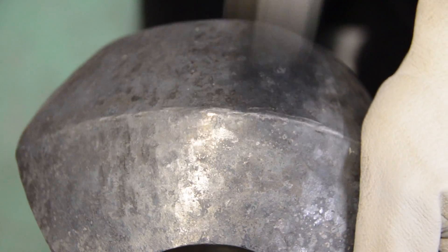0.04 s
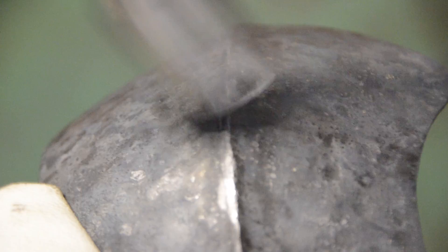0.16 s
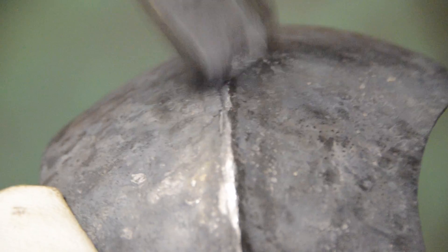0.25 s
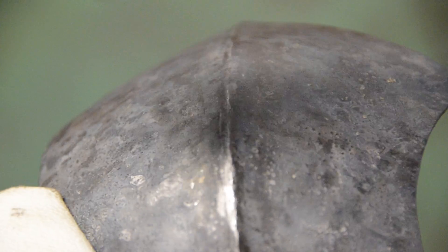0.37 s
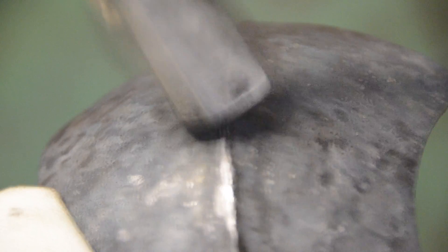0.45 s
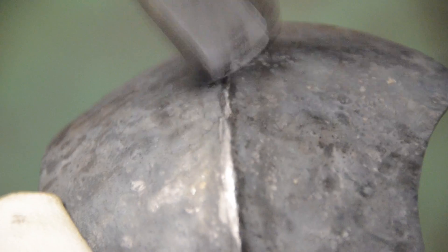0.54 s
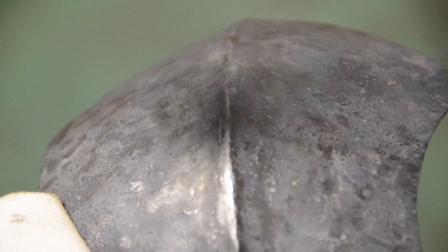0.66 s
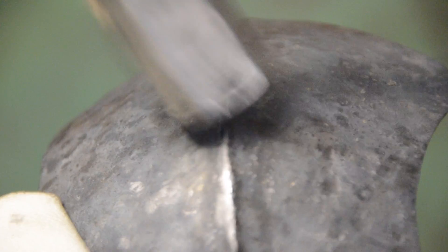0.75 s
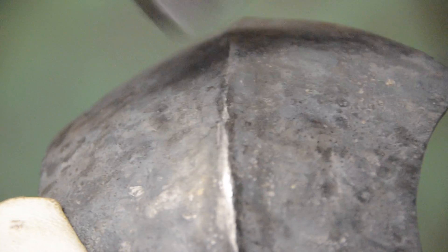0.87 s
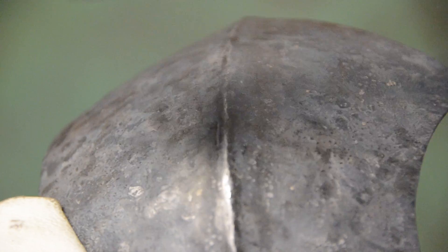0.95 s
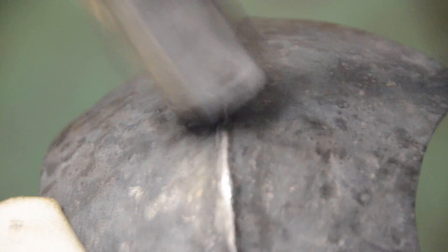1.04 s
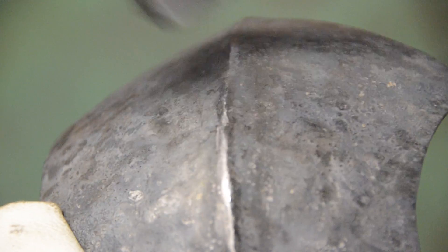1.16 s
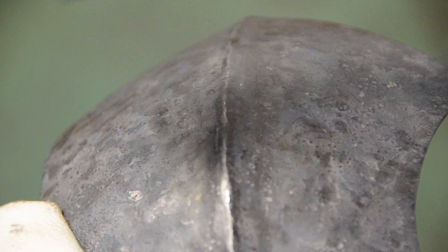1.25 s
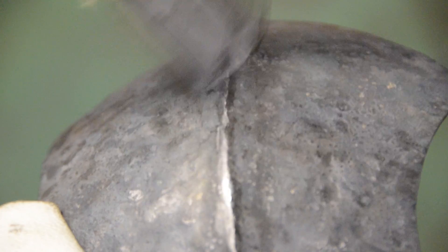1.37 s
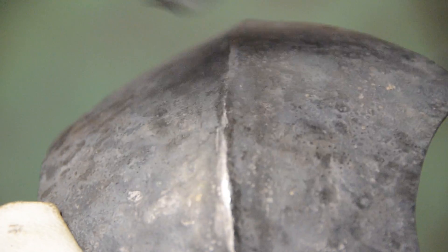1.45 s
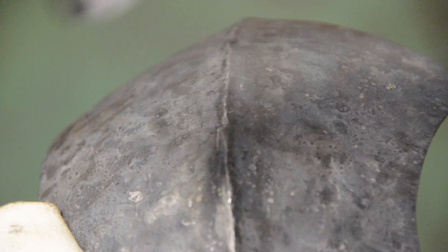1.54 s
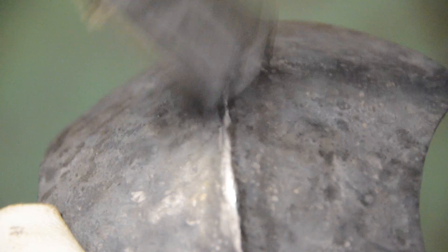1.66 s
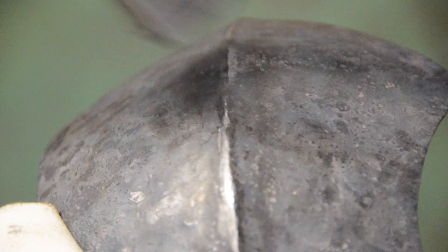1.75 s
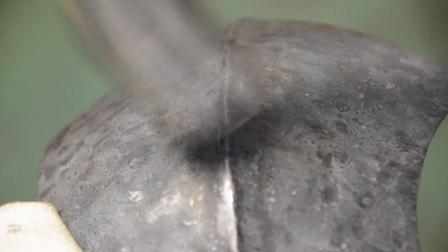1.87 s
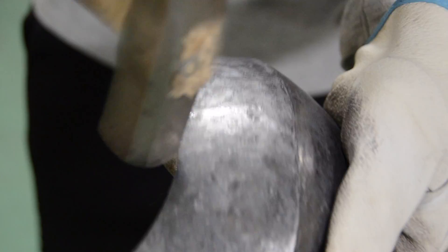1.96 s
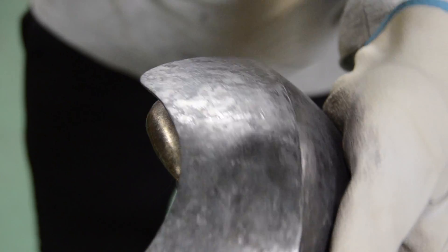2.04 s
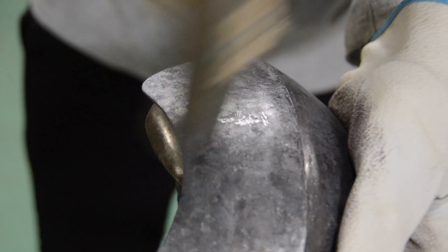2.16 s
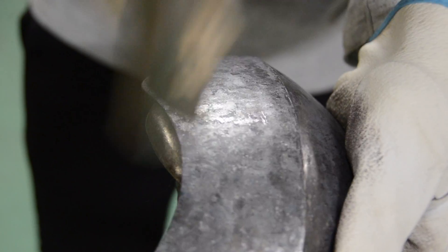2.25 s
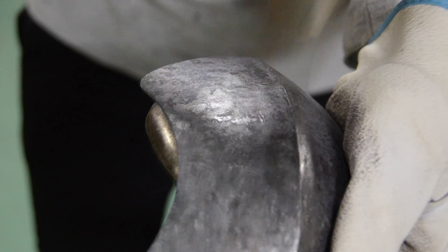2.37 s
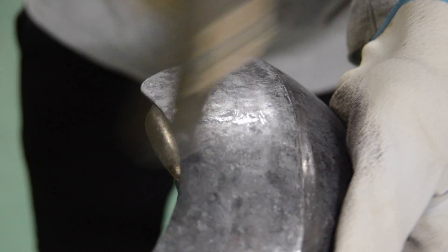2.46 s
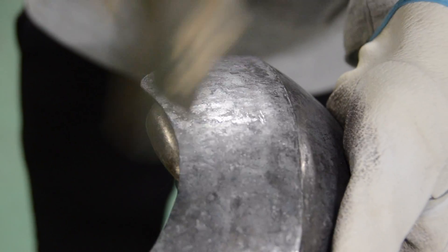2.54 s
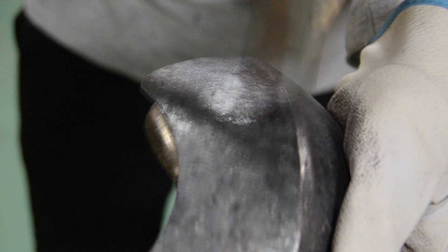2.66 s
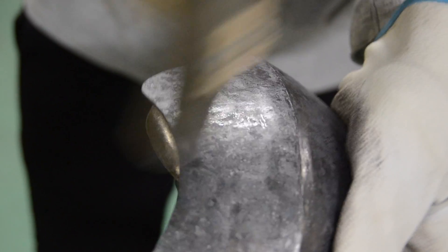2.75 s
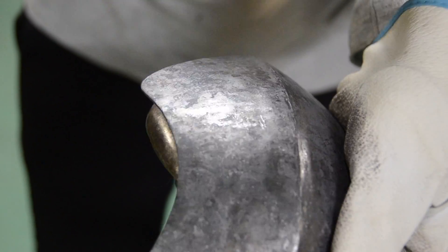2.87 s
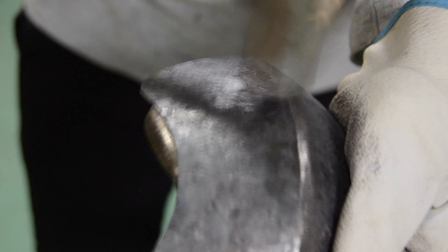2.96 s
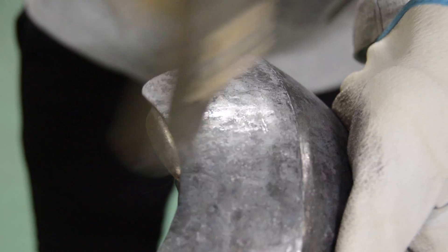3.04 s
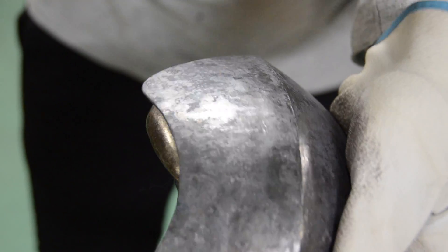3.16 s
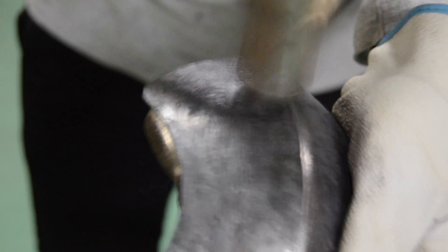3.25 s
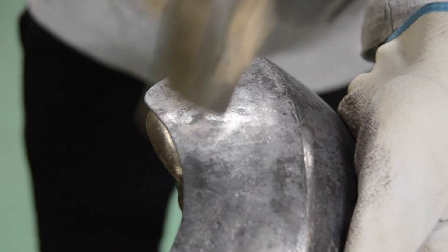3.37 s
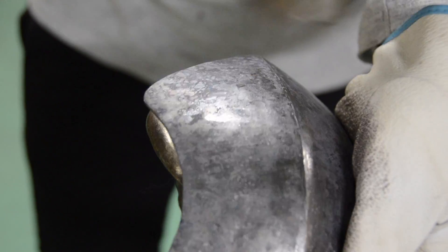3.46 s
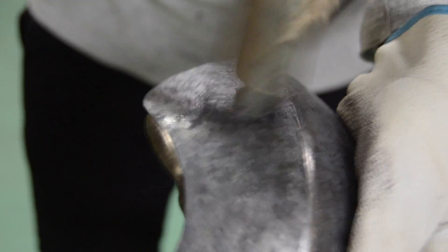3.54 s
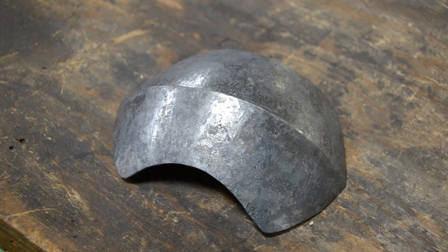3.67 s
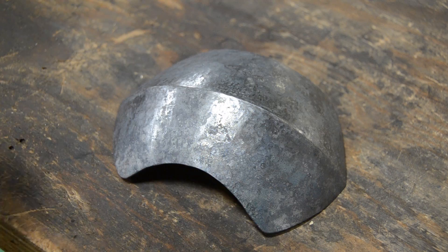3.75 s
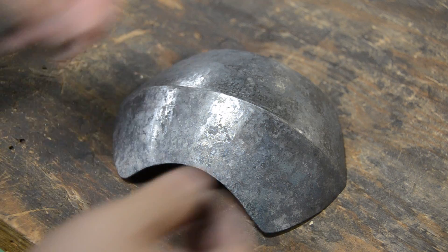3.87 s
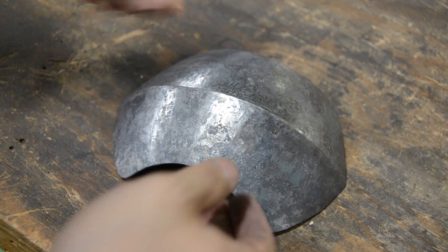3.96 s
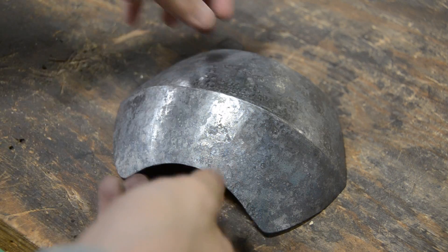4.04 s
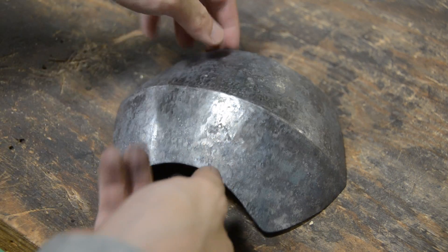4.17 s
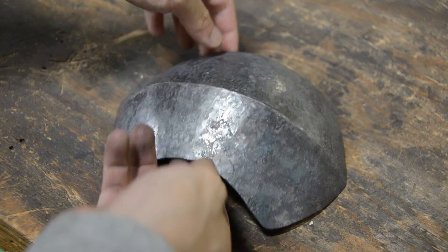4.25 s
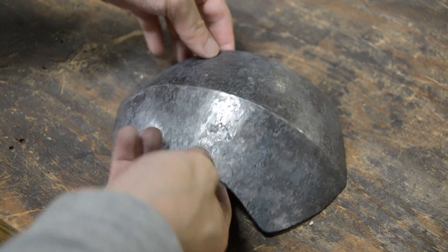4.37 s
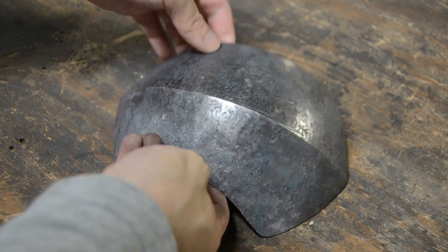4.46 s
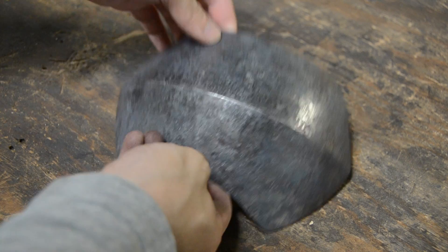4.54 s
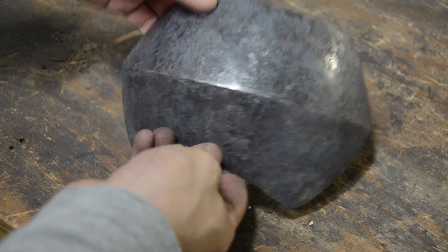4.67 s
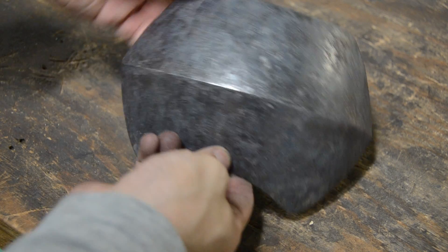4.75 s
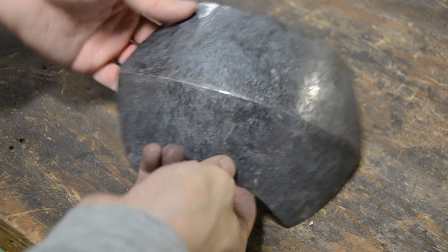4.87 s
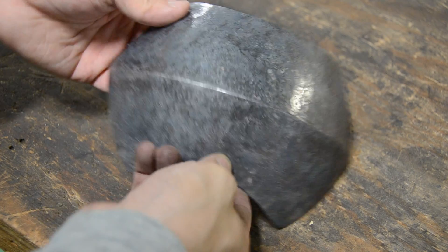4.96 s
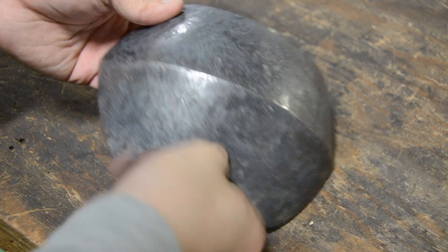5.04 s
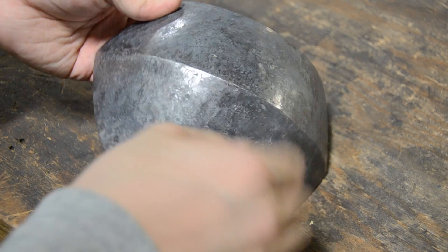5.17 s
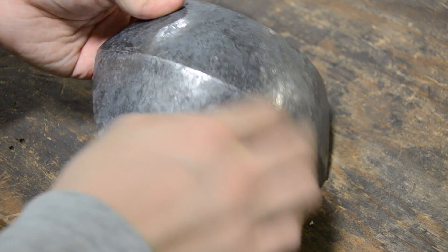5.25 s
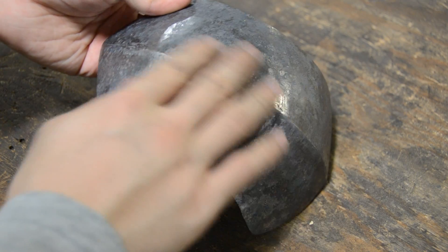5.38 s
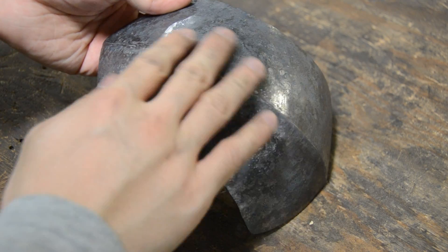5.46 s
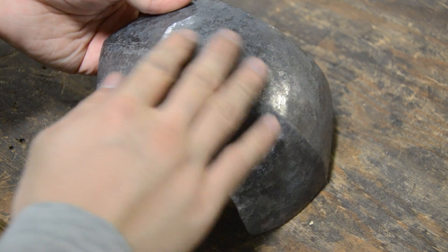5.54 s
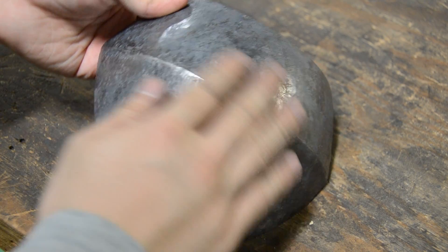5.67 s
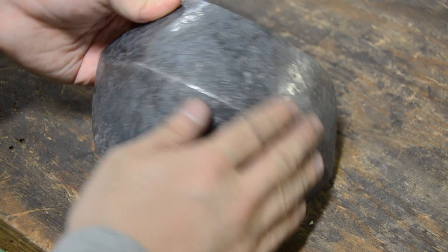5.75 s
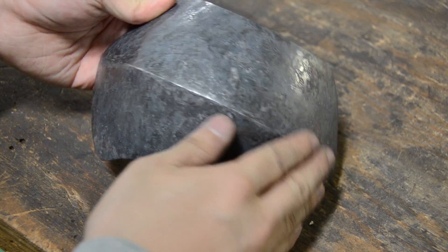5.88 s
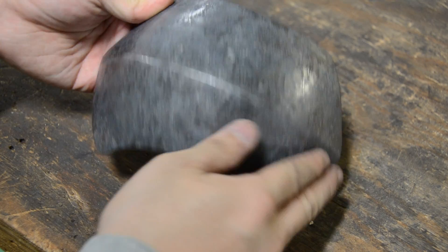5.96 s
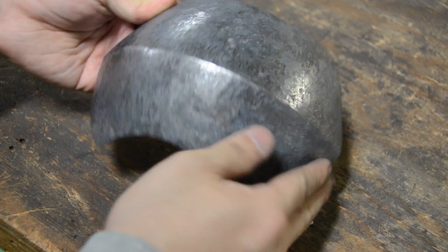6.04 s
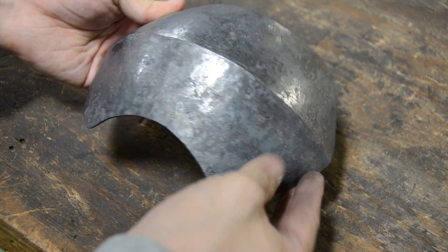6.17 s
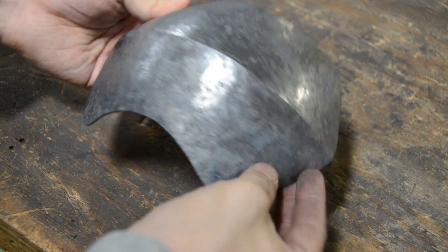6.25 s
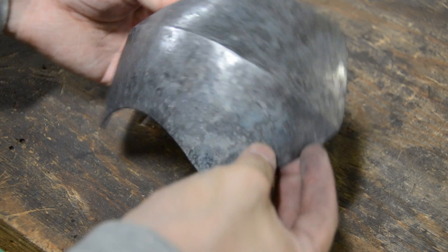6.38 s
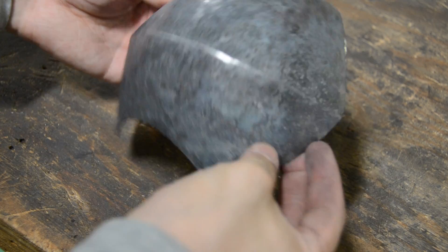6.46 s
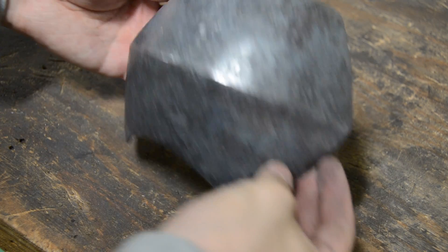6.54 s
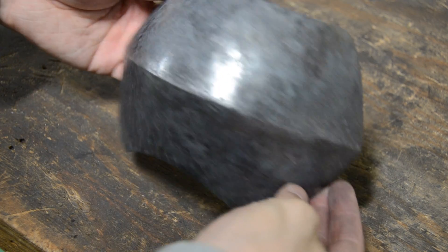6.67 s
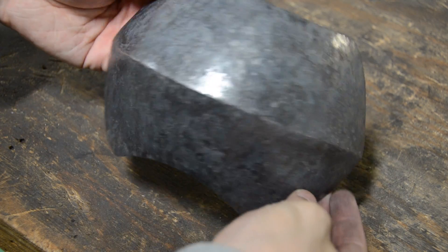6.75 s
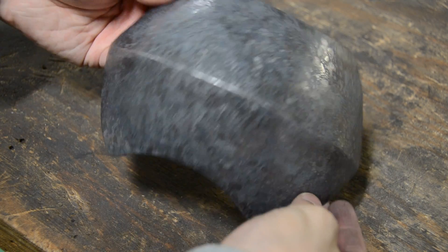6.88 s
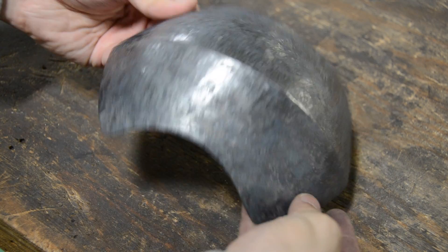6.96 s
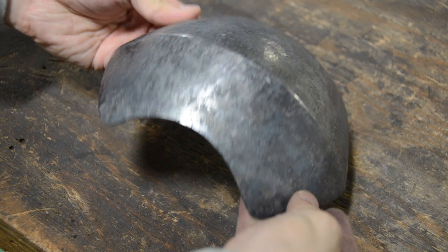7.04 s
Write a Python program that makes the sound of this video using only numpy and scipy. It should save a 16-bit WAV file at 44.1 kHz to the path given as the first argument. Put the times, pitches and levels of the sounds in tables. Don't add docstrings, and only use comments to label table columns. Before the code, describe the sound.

A hammer strikes a domed steel plate in a lively workshop, blows ringing and bouncing, then abruptly hands handle and rub the plate on a quiet bench.

```python
import sys
import numpy as np
from scipy import signal
from scipy.fft import rfft, irfft, next_fast_len
from scipy.io import wavfile
from scipy.ndimage import uniform_filter1d, map_coordinates

SR = 44100
rng = np.random.default_rng(int(sys.argv[2]) if len(sys.argv) > 2 else 0)


def digitize_waveform(pressure):
    field = np.atleast_2d(pressure).T
    bounded = np.clip(field, -1, 1)
    quanta = np.round(bounded * 32767).astype(np.int16)
    wavfile.write(sys.argv[1], SR, quanta)


def convert_level_to_amplitude(level_db):
    exponent = np.asarray(level_db, float) / 20
    return 10 ** exponent


N = 313551
LEAD = 0.25

VIEW_CHANGES = (1.951, 3.618)

# frequency in Hz, level in dB per Hz.
ROOM_TONE = [(15, -40.5), (25, -3.5), (317, 2), (362, 0.5), (462, 0), (543, 1), (3140, -10), (5700, -11.5),
             (6180, -9), (6880, -24), (8780, -17.5), (15900, -35)]
# frequency in Hz, level in dB.
MAINS_HUM = [(60, -55), (120, -61), (185, -56)]
# frequency in Hz, time to fall by 60 dB in seconds.
HALL_DECAY = [(100, 0.44), (500, 0.42), (2000, 0.45), (5000, 0.43), (10000, 0.36), (15000, 0.3)]
# delay in seconds, level in dB.
WALL_ECHOES = [(.0048, -8.5), (0.0132, -18), (0.0132, -19), (0.017, -18), (0.027, -16.5)]
# centre in Hz, width in Hz, depth in dB.
MICROPHONE_NOTCHES = [(5820, 720, -14), (6890, 82, -4.5)]

# centre in seconds, length in seconds, low part in dB, high part in dB.
SLEEVES = [
    (3.92, 0.38, -80, -64.5),
    (4.429, 0.34, -63.5, -67),
    (5.12, 0.59, -62, -75.5),
    (5.902, 0.75, -66, -73),
    (6.5, 0.7, -81.5, -68),
]

# start in seconds, peak in dB, extra boom in dB.
BENCH_KNOCKS = [
    (4.469, -35.5, -1.5),
    (4.904, -43, 9),
    (4.999, -27.5, -12),
    (5.089, -57, 19.5),
    (5.263, -45.5, 8.5),
    (5.681, -53, 1.5),
    (6.393, -54.5, -4),
    (6.774, -54.5, 0),
]
# frequency in Hz, width in Hz, level in dB.
BENCH_WOOD = [(367, 290, 7), (660, 120, 10), (915, 210, 3.5), (1280, 130, 2), (1900, 1200, -8.5)]
# frequency in Hz, width in Hz, level in dB.
BENCH_BOOM = [(118, 4.1, 8), (283, 63, -7)]

# centre in seconds, length in seconds, rubbing in dB,
# freedom of the lower modes in dB, pitch the grip leaves freest in Hz.
STROKES = [(4.171, .05, -64.5, -5, 4590), (4.25, 0.09, -65, -3, 5140), (4.327, 0.098, -58, -8, 5100),
           (4.445, 0.065, -64.5, -4, 5150), (4.521, .07, -73, 1, 5200), (4.68, 0.043, -56.5, -8.5, 5920),
           (4.736, 0.043, -56.5, -10.5, 5580), (4.913, 0.032, -62.5, 2, 4560),
           (4.993, 0.082, -53.5, -2, 4960), (5.065, .11, -54.5, -4, 6240), (5.16, .09, -72, -4, 6700),
           (5.27, 0.016, -57, -2, 4620), (5.385, 0.19, -54.5, -21.5, 6410), (5.704, 0.36, -50.5, -20, 5200),
           (5.966, .15, -51.5, -2, 6260), (6.177, .08, -60.5, 2, 6110), (6.262, 0.076, -66, 4, 6110),
           (6.421, .14, -59.5, -0.5, 4800), (6.714, .3, -70, -2, 6100), (6.94, 0.1007, -65, -7, 6120),
           (7.02, 0.039, -60.5, -15.5, 6090), (7.086, 0.089, -64.5, -6.5, 6080),
           (5.4, 3.4, -80, -17.5, 5247)]
# start in seconds, peak in dB, extra ring in dB.
TICKS = [(4.1534, -50, 0), (4.4314, -54.5, 1.5), (4.5064, -50, 1), (4.6748, -52, 0), (4.7314, -47.5, -4.5),
         (4.8794, -53, 6), (4.9072, -41, -1), (4.9614, -50, 0), (5.024, -32, -5.5), (5.0464, -33, -8),
         (5.0674, -44, 7), (5.1544, -39.5, -7), (5.2664, -49, -1.5), (5.2959, -42.5, -1),
         (5.6894, -38.5, -3.5), (6.1559, -46, -3), (6.2414, -46.5, 0.5), (6.3939, -42.5, 3.5),
         (7.0135, -51, -1)]
# frequency in Hz, level in dB per Hz.
SKIN_HISS = [(880, -45), (1500, -19), (2180, -16.5), (4530, -27), (4910, -24), (5310, -26), (5810, -1),
             (7290, -7), (9610, 1), (15900, -37)]
# frequency in Hz, width in Hz, level in dB.
FREE_PLATE = [(2990, 25, 0), (3780, 120, -9), (4560, 48, -1), (5250, 24, 1.5), (5400, 32, -1),
              (6110, 42, 7), (6840, 50, 3), (7204, 48, -5), (7200, 60, -12), (7490, 45, 0), (8000, 20, -8),
              (8000, 50, -5), (8557, 44, -5), (8600, 62, -3), (9800, 32, -2), (9220, 31, -8.5),
              (9650, 60, -18), (10200, 50, -17), (10250, 70, -22.5), (10100, 60, -16), (10800, 69, -13),
              (11570, 60, -7), (12300, 60, -14), (13000, 80, -18)]

# start in seconds, peak in dB, thud in dB, low ring in dB, deep part in dB.
RIDGE_BLOWS = [
    (-.18, -0.5, -1, -12.5, -0.5),
    (.108, 16.5, -6, -20, -2.5),
    (.199, 5.5, -6, -0.5, -4.5),
    (0.482, 11, -3.5, -1.5, -1),
    (.772, 4.5, -3, -2, 0.5),
    (1.061, 5.5, -3, -10.5, -0.5),
    (1.346, 3, -5, -1, -5),
    (1.637, 10, -4.5, -15, -1),
    (1.916, 2, -9, -10, -9),
]
# start in seconds, peak in dB.
RIDGE_BOUNCES = [
    (0.821, -10.5),
    (1.388, -11),
]
# thud, low ring, bright part, deep part [dB].
RIDGE_BOUNCE_COLOUR = (-4.5, -16, -13.5, -1.5)
# start in seconds, peak in dB, thud in dB.
RIM_BLOWS = [
    (1.84, 3.5, -11),
    (2.123, -1.5, -4),
    (2.4106, 9, -3.5),
    (2.69, 8.5, -6.5),
    (2.978, 7.5, -10.5),
    (3.262, 7, -13),
    (3.538, 6, -11),
]
# low ring, bright part, deep part [dB].
RIM_BLOW_COLOUR = (-3.5, -3, -5.5)
# start in seconds, peak in dB.
RIM_BOUNCES = [
    (1.868, -0.5),
    (2.1464, 7),
    (2.18, -10),
    (2.44, 3.5),
    (2.723, 7),
    (3.009, 5.5),
    (3.289, -0.5),
    (3.572, -3.5),
]
# thud, low ring, bright part, deep part [dB].
RIM_BOUNCE_COLOUR = (1, -6, -7.5, -5)
# frequency in Hz, level in dB per Hz.
RIDGE_BODY = [(35, -60), (60, -36), (447, -23.5), (879, -16.5), (1040, -11.5), (1860, -3.5), (2240, -4.5),
              (2570, -6.5), (3650, -23), (4110, -18), (5830, -21), (8670, -21), (12600, -39.5),
              (15900, -50.5)]
RIM_BODY = [(35, -59.5), (60, -35.5), (184, -11), (388, -13.5), (1160, -2), (2290, -5), (3410, -11.5),
            (4010, -1), (5310, -29.5), (5690, -16.5), (6110, -4), (9290, -7), (14100, -29), (15900, -84.5)]
# frequency in Hz, width in Hz, level in dB.
RIDGE_RING = [(936, 140, -13), (2545.5, 24, 4.5), (2573, 30, -1), (4090, 48, -10), (5310, 49, -19),
              (6230, 26, -13), (6550, 24, -18.5), (7280, 36, -24), (7476, 32, -29), (7735, 9.5, -27.5),
              (8645, 59, -30.5), (8847, 30, -24.5), (9600, 31, -24), (11100, 84, -33)]
RIM_RING = [(1750, 13, -11), (1996, 20, -2.5), (2239, 41, -13.5), (3739, 46, -3.5), (4035, 28, 2.5),
            (5260, 110, -9), (6106, 50, -3), (6680, 140, -16), (7000, 60, -7.5), (7830, 42, -9),
            (8420, 55, -0.5), (9300, 25, -4.5), (10150, 70, -10), (10880, 57, -16), (11050, 190, -22),
            (12700, 66, -29.5), (13000, 130, -28)]
# frequency in Hz, level in dB.
RIDGE_FACING = [(500, -1), (1400, 6), (2000, -1), (2550, 0), (3300, -2), (12000, 8.5)]
RIM_FACING = [(500, -3), (1400, 1.5), (2500, 1.5), (3900, -0.5), (8000, 3), (12000, 1.5)]


def unit(x):
    return x / np.sqrt(np.mean(x ** 2) + 1e-20)


def along(points, hz):
    f, v = np.transpose(points)
    return np.interp(np.log(hz + 1), np.log(f + 1), v)


def causal(gain):
    cepstrum = irfft(np.log(gain + 1e-6))
    half = len(cepstrum) // 2
    cepstrum[1:half] *= 2
    cepstrum[half + 1:] = 0
    return np.exp(rfft(cepstrum))


def modes(table, f):
    total = 0
    for k, (hz, width, db) in enumerate(table):
        damping = 1j * f * width
        total = total + (-1) ** k * convert_level_to_amplitude(db) * damping / (hz * hz - f * f + damping + 1e-9)
    return total


def filtered(x, response):
    m = next_fast_len(len(x) + SR // 2) // 2 * 2
    return irfft(rfft(x, m) * response(np.fft.rfftfreq(m, 1 / SR)), m)[:len(x)]


def wobble(step):
    knots = rng.standard_normal(int(N / step) + 4)
    return map_coordinates(knots, [np.arange(N) / step], order=1)


def swells(centre, length, db):
    t = np.arange(N)[::32, None] / SR
    place = np.abs(2 * (t - centre) / length)
    gain = convert_level_to_amplitude(db - 14.5 * place ** 3.8).sum(axis=1)
    return np.interp(np.arange(N) / SR, t[:, 0], gain)


def pulses(rows, extra):
    x = np.zeros(N)
    for s, db, more_db in rows:
        x[round(s * SR)] = convert_level_to_amplitude(db + extra * more_db)
    return x


def air(n):
    return unit(filtered(rng.standard_normal(n), lambda f: convert_level_to_amplitude(along(ROOM_TONE, f))))


def quiet():
    centre, length, low_db, high_db = np.transpose(SLEEVES)
    tone = air(N)
    upper = filtered(tone, lambda f: 1j * f / (900 + 1j * f))
    low = np.hypot(convert_level_to_amplitude(-64.5), swells(centre, length, low_db))
    high = np.hypot(convert_level_to_amplitude(-68), swells(centre, length, high_db + 1))
    return low * (tone - upper) + high * upper


def hall(x, near, wet_db):
    hz, t, z = signal.stft(rng.standard_normal(len(x)), SR, nperseg=256)
    decay = convert_level_to_amplitude(-60 * t / along(HALL_DECAY, hz)[:, None])
    tail = signal.istft(z * decay, SR, nperseg=256)[1][:len(x)]
    tail = tail * (1 - np.exp(-np.arange(len(x)) / (SR * 0.027)))
    tail = convert_level_to_amplitude(wet_db) * tail / np.linalg.norm(tail)
    walls = sum(convert_level_to_amplitude(db) * np.pad(near, (round(s * SR), 0))[:len(x)] for s, db in WALL_ECHOES)
    return near + walls + signal.fftconvolve(x, tail)[:len(x)]


def bench():
    def soft(f):
        return np.exp(-2j * np.pi * f * 0.00292) / (1 + 1j * f / 1500) ** 2

    knock = filtered(pulses(BENCH_KNOCKS, extra=0), lambda f: convert_level_to_amplitude(27) * soft(f) * modes(BENCH_WOOD, f))
    boom = filtered(pulses(BENCH_KNOCKS, extra=1), lambda f: convert_level_to_amplitude(45.5) * soft(f) * modes(BENCH_BOOM, f))
    near = knock + boom
    start = round(4.4 * SR)
    return np.pad(hall(knock[start:], near[start:], wet_db=-8), (start, 0))


def hands():
    centre, length, rub_db, free_db, grip_hz = np.transpose(STROKES)
    rub = swells(centre, length, rub_db)

    def free(hz):
        damped_db = 26 * np.abs(np.log2(hz / grip_hz))
        return swells(centre, length, rub_db + free_db + 9 - damped_db)

    palm = swells(centre, length, rub_db - 0.31 * free_db - 10)
    hiss = unit(filtered(rng.standard_normal(N), lambda f: convert_level_to_amplitude(along(SKIN_HISS, f))))
    slips = convert_level_to_amplitude(13.5) * unit(rng.standard_normal(N) * convert_level_to_amplitude(4.6 * wobble(150)))
    taps = convert_level_to_amplitude(25) * pulses(TICKS, extra=1)
    sing = np.zeros(N)
    for hz, width, db in FREE_PLATE:
        keep = np.exp(-np.pi * width / SR)
        pole = [1, -2 * keep * np.cos(2 * np.pi * hz / SR), keep ** 2]
        push = slips * (free(hz) if hz < 7000 else rub) + taps
        push = push * convert_level_to_amplitude(db + 2.5 * wobble(2600))
        sing += signal.lfilter([1 - keep, 0, keep - 1], pole, push)
    ticks = filtered(pulses(TICKS, extra=0), lambda f: convert_level_to_amplitude(-7) * causal(convert_level_to_amplitude(along(SKIN_HISS, f) / 2)))
    sing = filtered(sing, lambda f: 1 / (1 + (f / 11500) ** 8) / (1 + (2500 / (f + 1)) ** 6))
    return palm * hiss + sing + ticks


def rough_contact(chatter):
    t = np.arange(SR) / SR
    contact = rng.standard_normal(SR) * np.exp(-t / chatter)
    contact[0] += 4
    contact = rfft(contact)
    contact = irfft(contact / causal(np.abs(contact)))
    return rfft(contact * np.exp(-t / (5 * chatter)))


def hammer(blows, body, ring, facing, ring_db, chatter, drive_db):
    out = np.zeros(N + 2 * SR)
    f = np.fft.rfftfreq(SR, 1 / SR)
    toward = causal(convert_level_to_amplitude(along(facing, f)))
    for s, db, thud_db, low_db, bright_db, deep_db in blows:
        contact = rough_contact(chatter)
        tilt = [(1000, deep_db), (1400, thud_db), (2600, thud_db), (3300, bright_db)]
        struck = []
        for (hz, width, mode_db), share_db in zip(ring, 1.8 * rng.standard_normal(len(ring))):
            colour_db = low_db if 1500 < hz < 4500 else along(tilt, hz)
            struck.append((hz, width, mode_db + share_db + colour_db))
        clumps_db = 3.5 * np.interp(f / 90.34, np.arange(300), rng.standard_normal(300))
        dense = causal(convert_level_to_amplitude(along(body, f) + along(tilt, f) + clumps_db))
        blow = contact * (dense + convert_level_to_amplitude(ring_db) * modes(struck, f))
        start = round((s + LEAD + 0.0007) * SR)
        out[start:][:SR] += convert_level_to_amplitude(db + drive_db) * hall(irfft(blow), irfft(blow * toward), wet_db=-4.5)
    return out[:N + round(LEAD * SR)]


def ridge_hammering():
    blows = [row + RIDGE_BOUNCE_COLOUR for row in RIDGE_BOUNCES]
    for s, db, thud_db, low_db, deep_db in RIDGE_BLOWS:
        blows.append((s, db, thud_db, low_db, -1 + 0.22 * low_db, deep_db))
    return hammer(sorted(blows), RIDGE_BODY, RIDGE_RING, RIDGE_FACING, ring_db=2, chatter=0.0056, drive_db=64.5)


def rim_hammering():
    blows = [row + RIM_BLOW_COLOUR for row in RIM_BLOWS]
    blows += [row + RIM_BOUNCE_COLOUR for row in RIM_BOUNCES]
    return hammer(blows, RIM_BODY, RIM_RING, RIM_FACING, ring_db=8.5, chatter=0.0035, drive_db=47.5)


def microphone(x):
    def notches(f):
        db = sum(depth / (1 + (2 * (f - hz) / width) ** 2) for hz, width, depth in MICROPHONE_NOTCHES)
        return causal(convert_level_to_amplitude(db))

    return filtered(x, notches)


def gain_control(x, knee_db, recover_db, air_db):
    t = np.arange(len(x)) / SR
    hum = sum(convert_level_to_amplitude(db) * np.sin(2 * np.pi * hz * t) for hz, db in MAINS_HUM)
    x = x + convert_level_to_amplitude(air_db) * air(len(x)) + hum
    power = np.abs(uniform_filter1d(x ** 2, 64, origin=31))
    over = 10 * np.log10(power + 1e-12) - knee_db
    climb = recover_db * t
    cut_db = np.maximum(np.maximum.accumulate(over + climb) - climb, 0)
    keep = np.exp(-1 / (SR * 0.00049))
    gain = convert_level_to_amplitude(-signal.lfilter([1 - keep], [1, -keep], cut_db))
    x = np.clip(x * gain, -1.06, 1.06)
    x = filtered(x, lambda f: 1j * f / (58 + 1j * f) / (1 + (f / 15000) ** 16))
    return x[round(LEAD * SR):]


def scene():
    ridge = gain_control(microphone(ridge_hammering()), knee_db=3.5, recover_db=71, air_db=-47.5)
    rim = gain_control(microphone(rim_hammering()), knee_db=-1.5, recover_db=89.5, air_db=-48.5)
    stroking = microphone(quiet() + bench() + hands())
    t = np.arange(N) / SR
    return np.select([t < VIEW_CHANGES[0], t < VIEW_CHANGES[1]], [ridge, rim], stroking)[None]


def low_pass(x):
    return signal.sosfilt(signal.butter(12, 16050, fs=SR, output="sos"), x)


def record(dry):
    mix = np.clip(dry, -1, 1)
    return low_pass(mix)


dry = scene()
out = record(dry)
digitize_waveform(out)
```